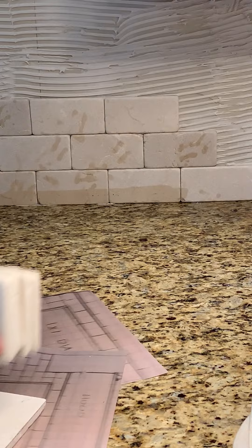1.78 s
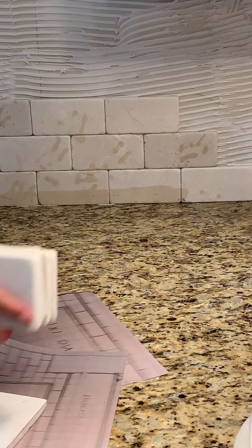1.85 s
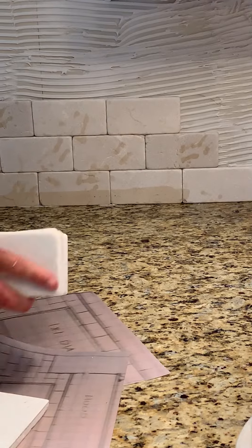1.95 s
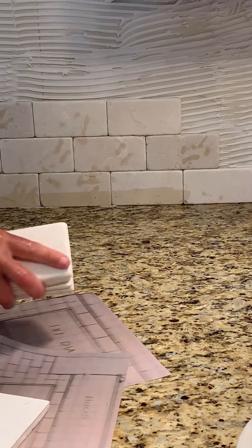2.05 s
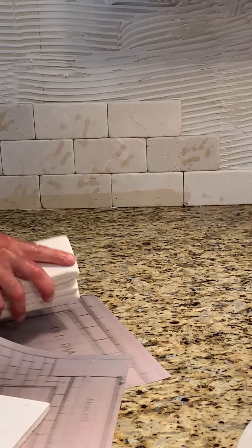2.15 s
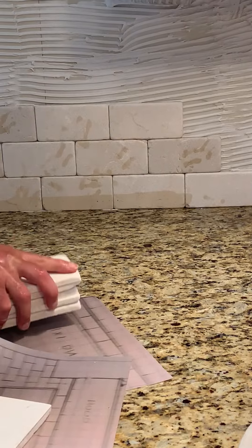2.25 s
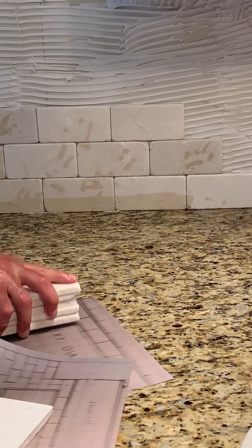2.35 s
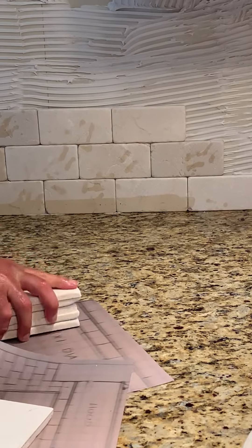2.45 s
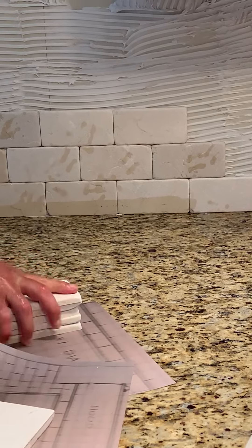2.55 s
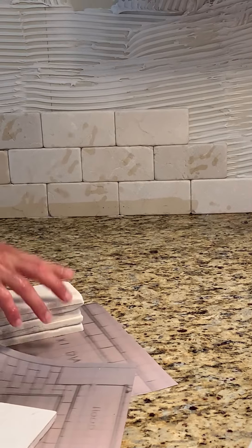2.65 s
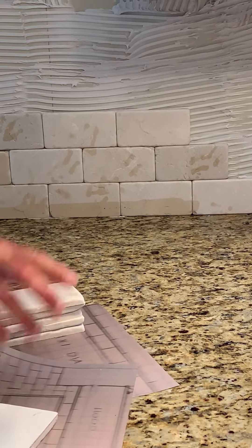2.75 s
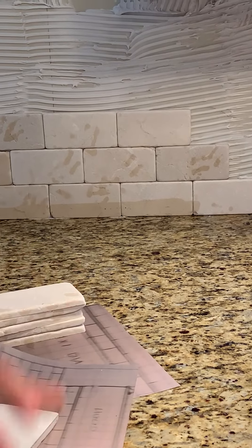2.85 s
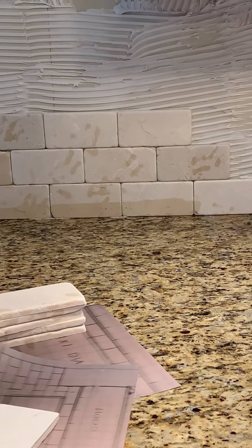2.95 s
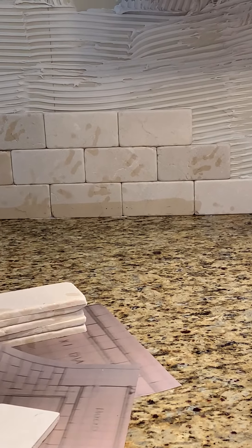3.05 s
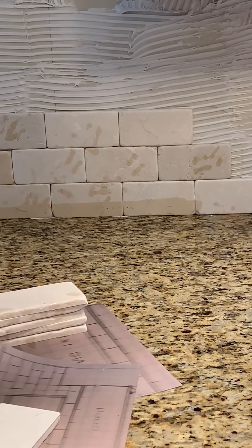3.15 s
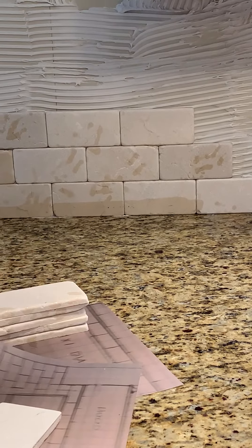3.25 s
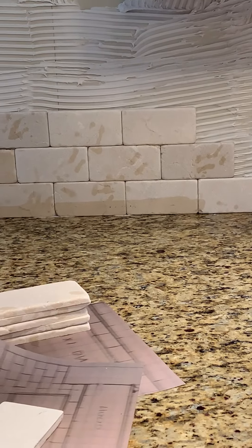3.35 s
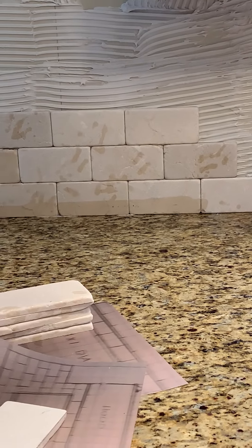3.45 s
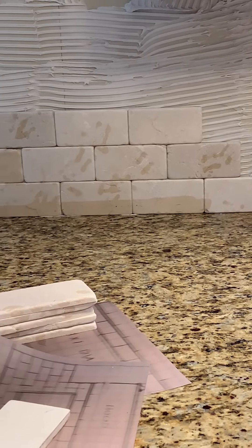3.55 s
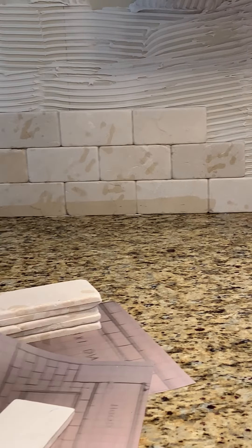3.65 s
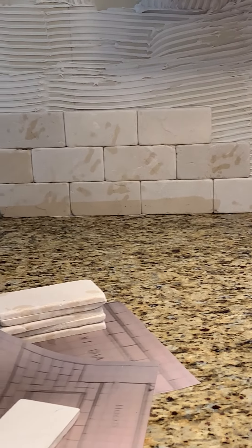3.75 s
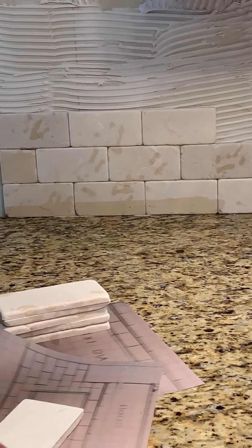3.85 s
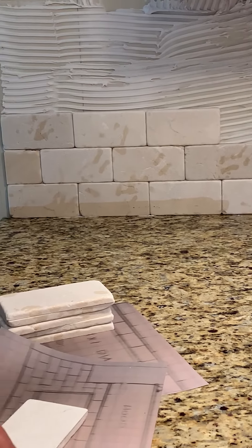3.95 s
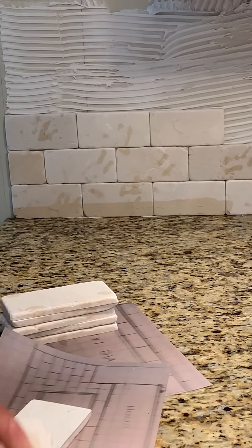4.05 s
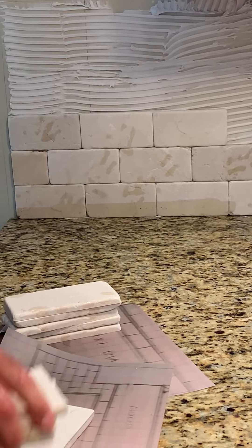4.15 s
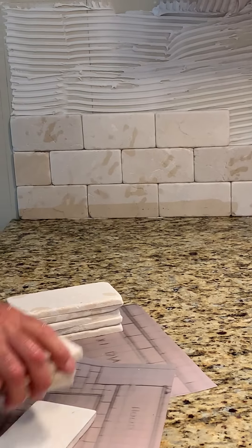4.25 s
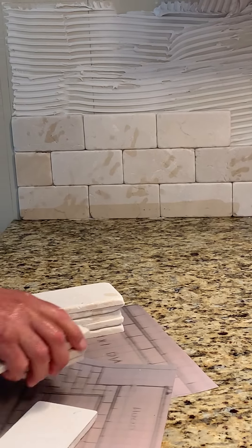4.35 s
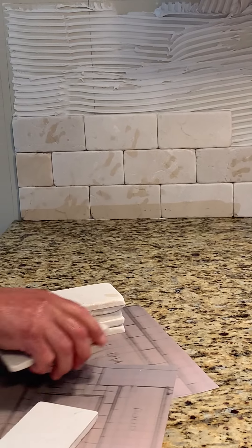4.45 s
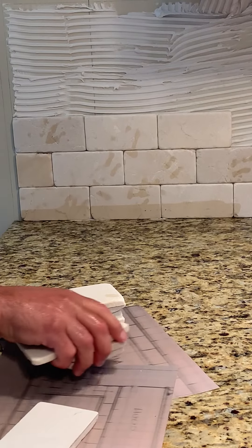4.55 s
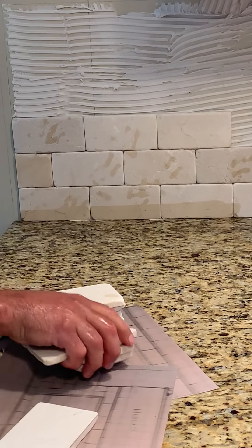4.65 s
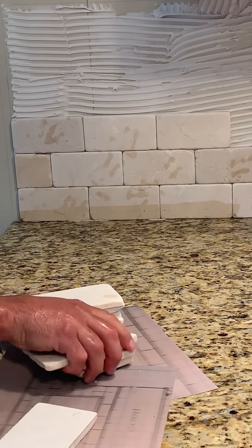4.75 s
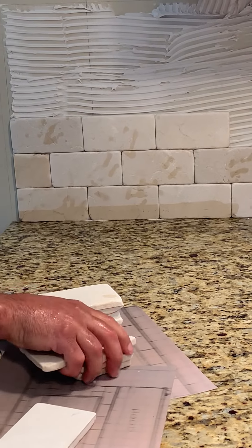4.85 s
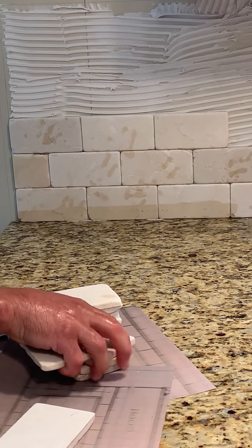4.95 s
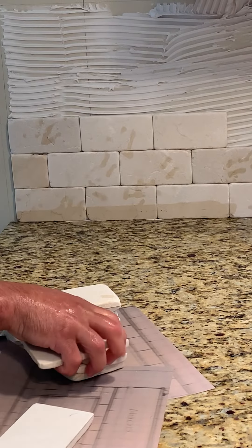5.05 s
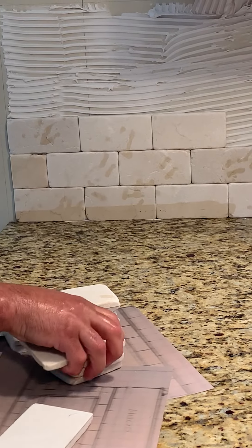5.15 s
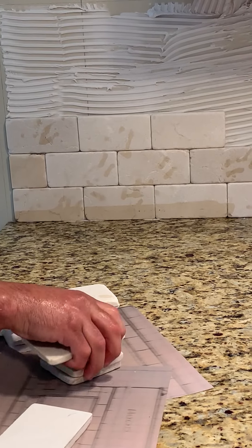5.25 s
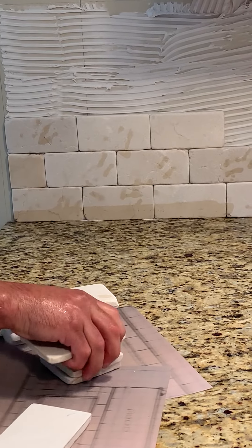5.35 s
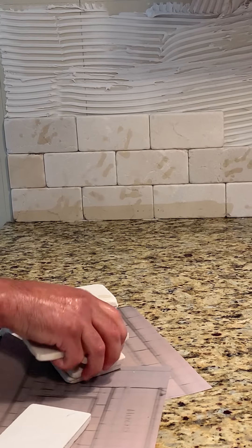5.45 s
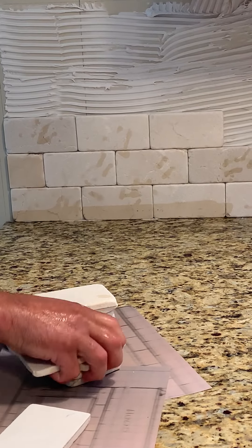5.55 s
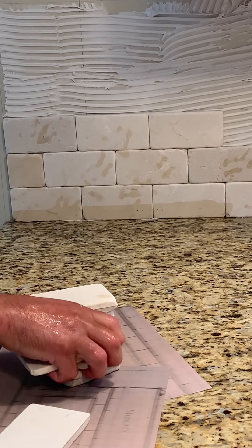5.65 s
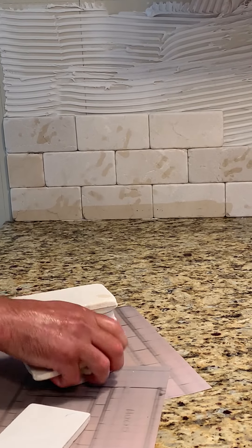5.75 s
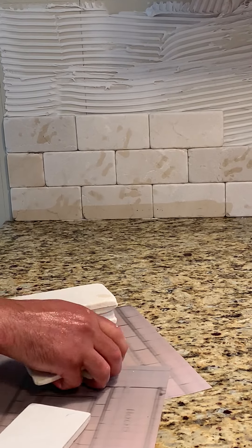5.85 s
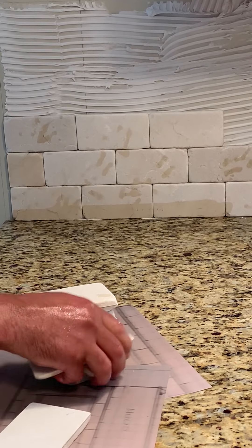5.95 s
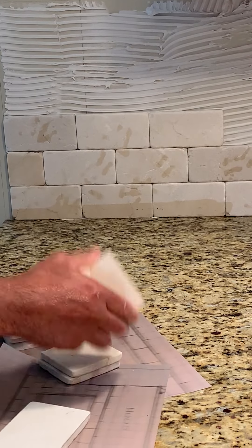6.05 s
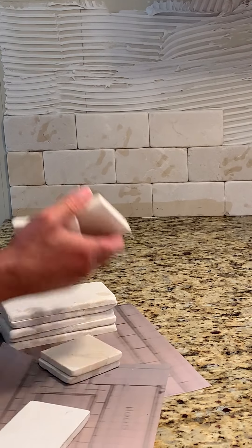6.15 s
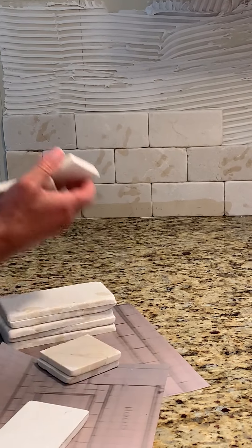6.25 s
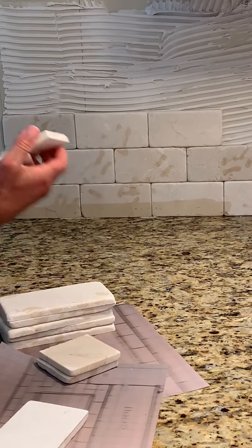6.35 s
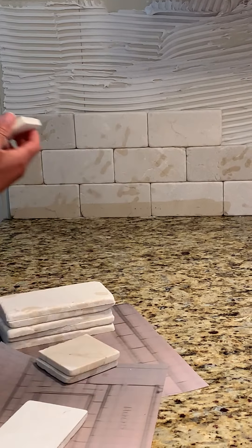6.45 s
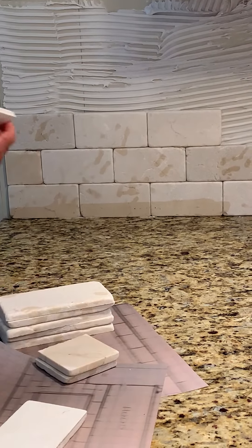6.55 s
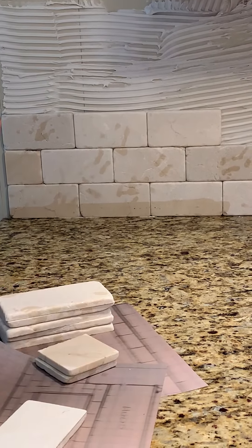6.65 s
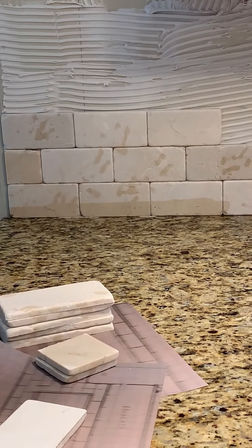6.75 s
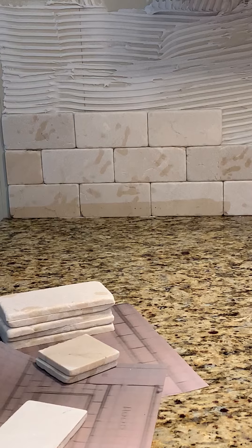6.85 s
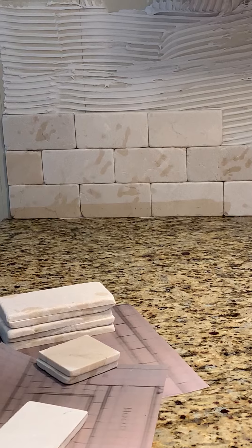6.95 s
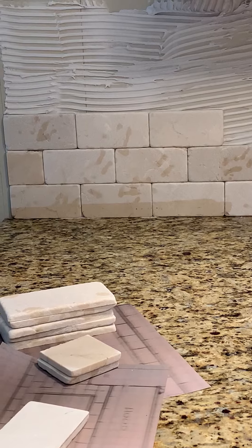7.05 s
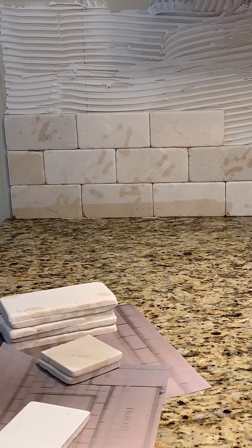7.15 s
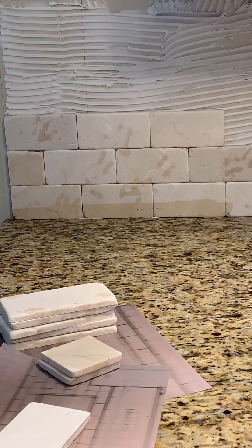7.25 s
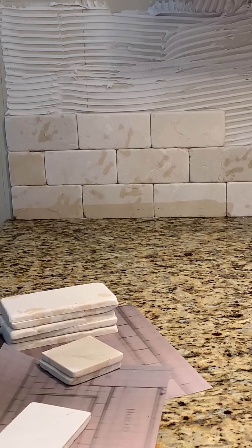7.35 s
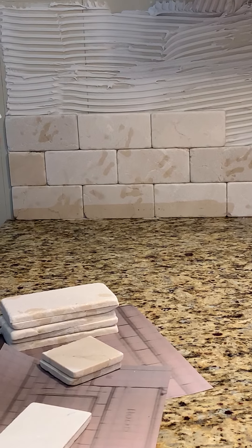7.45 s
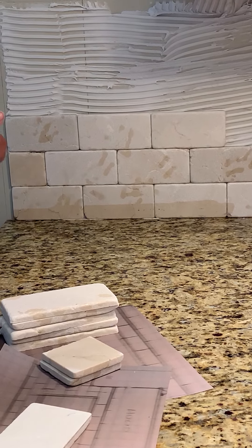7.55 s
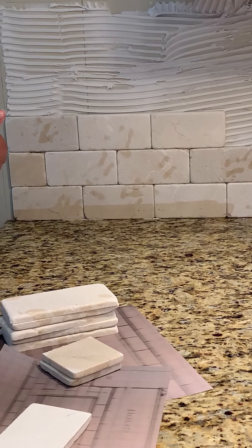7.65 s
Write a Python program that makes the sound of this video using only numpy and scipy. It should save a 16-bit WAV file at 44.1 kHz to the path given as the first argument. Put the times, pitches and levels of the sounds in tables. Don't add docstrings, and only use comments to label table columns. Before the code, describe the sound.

Close to a phone microphone in a small hard kitchen, long stone tiles are set down on paper with gritty clacks and scrapes. A loud, coarse clatter of pieces follows, then a bright ringing rattle from a small tile, duller gripped knocks, and finally faint taps and soft counter thuds. A low compressor hum and soft air noise run throughout.

```python
import sys
import numpy as np
from scipy import signal
from scipy.fft import rfft, irfft, next_fast_len
from scipy.io import wavfile
from scipy.ndimage import uniform_filter1d

SR = 44100
rng = np.random.default_rng(int(sys.argv[2]) if len(sys.argv) > 2 else 0)


def transcribe(signal):
    frames = np.atleast_2d(signal).T
    limited = np.clip(frames, -1, 1)
    pcm = np.round(limited * 32767).astype(np.int16)
    wavfile.write(sys.argv[1], SR, pcm)


def linear_from_db(decibels):
    return 10 ** (np.asarray(decibels, float) / 20)


N = 340011

# (pitch [Hz], level [dB], t60 [s])
SMALL_MODES = [(2630, -9.5, 0.012), (2757, -2, 0.036), (2990, -16.5, 0.025), (3870, -11.5, 0.019),
               (4310, -12.5, 0.017), (4740, -12.5, .01), (5408, -1, 0.0079), (5810, 4, 0.021),
               (6180, 6, .05), (6053, 4.5, 0.1), (6182, 5.5, 0.23), (6280, 2, .07), (6345, -1, 0.036),
               (9280, -8, 0.043), (11350, 0, 0.15), (14900, -10.5, 0.0815), (15250, -7, .06)]
STIFF_HZ = 4430
# scrape [Hz], treble [dB], treble lost per dB of ring [dB]
SMALL_GRIT = (3300, -11, 0.24)
FINE_GRIT_DB, COARSE_GRIT_DB = 1.2, 3.0


def band(x, lo_hz, hi_hz, order=2):
    edges = [lo_hz, min(hi_hz, .45 * SR)]
    return signal.sosfilt(signal.butter(order, edges, "bandpass", fs=SR, output="sos"), x)


def unit(x):
    return x / np.sqrt(np.mean(x ** 2))


def peak(x, db):
    return x * linear_from_db(db) / np.abs(x).max()


def on_log(hz, table):
    f, v = np.transpose(table)
    return np.interp(np.log(hz + 1), np.log(f), v)


def walk(rate):
    hold = int(SR / rate)
    steps = np.repeat(rng.standard_normal(N // hold + 1), hold)
    return 1.3 * uniform_filter1d(uniform_filter1d(steps, hold), hold)[:N]


def add(track, start_s, x):
    i = int(start_s * SR)
    x = x[..., max(-i, 0):N - i]
    track[..., max(i, 0):max(i, 0) + x.shape[-1]] += x


def long_tiles():
    # (time [s], crack peak [dB], crack pitch [Hz], treble re crack [dB], ring re crack [dB])
    long_knocks = [(0.009, -47.5, 1310, 7, 1.5), (0.049, -48, 666, 3.5, 6.5), (0.307, -62, 3000, 3, -8),
                   (0.371, -39, 1200, -6, -22), (2.39, -44, 1140, -26, 5), (2.46, -26, 750, -12.5, 16),
                   (2.463, -14.5, 2090, -46, -3), (2.597, -28, 2400, -18, 4),
                   (2.601, -23.5, 2670, -20.5, 8.5), (2.604, -27, 824, -29, -1),
                   (3.151, -41.5, 900, -11, -2), (3.249, -24, 3700, -4, -3.5), (3.393, -38, 730, 0, 5),
                   (3.44, -37, 2500, -8, 7)]
    # (middle [s], scrape [dB], ring re scrape [dB], half length [s])
    long_rubs = [(.25, -53, 5, 0.026), (.373, -58, 20, 0.018), (.46, -68, 6, 0.016), (.50, -64, 25, 0.016),
                 (.555, -69, 28, 0.029), (.751, -63, 25, 0.009), (.797, -58.5, 27, 0.0064),
                 (.835, -57.5, 29.5, 0.038), (.94, -59, 36.5, 0.045), (1.054, -56.5, 35, .024),
                 (1.092, -75, 41, 0.081), (2.456, -44, -1, 0.0061), (2.58, -53.5, 6, 0.051),
                 (2.601, -50, 3, 0.0067)]
    # (pitch [Hz], level [dB], t60 [s])
    long_modes = [(750, 0, 0.025), (1970, -3, 0.013), (2654, -9, 0.029), (3197, 0.5, 0.041),
                  (3850, -16.5, 0.0049), (6840, 0.5, 0.029), (6630, -3, 0.021), (7100, -23, 0.035),
                  (10230, -8.5, 0.1), (11160, -15.5, 0.034), (12020, -7, 0.076), (13100, -13, 0.042),
                  (13250, -17, 0.027)]
    slides = rubs(long_rubs, hz=3100, treble_db=-2.6, loss=0.51)
    return tile(blows(long_knocks), slides, long_modes, FINE_GRIT_DB, contact_s=0.0037, octaves=1.0)


def pieces():
    # (time [s], crack peak [dB], crack pitch [Hz], treble re crack [dB], ring re crack [dB])
    piece_knocks = [(3.993, -47, 802, -18.5, 18), (4.003, -39.5, 1010, -12.5, 11),
                    (4.083, -31.5, 1630, -7.5, -20), (4.099, -27, 802, -3.5, -9),
                    (4.108, -18, 859, -6.5, -25), (4.124, -18.5, 1280, -6.5, -12),
                    (4.133, -18, 1490, -7.5, -9), (4.1454, -34, 3750, 2.5, 5), (4.1632, -10, 4240, -6.5, 4),
                    (4.209, -34, 826, -4, -14), (4.211, -36, 2800, -11.5, 11),
                    (4.5836, -41.5, 2910, -16, 6), (4.777, -24.5, 1000, -27.5, -8.5),
                    (4.894, -45.5, 2500, 0, -6.5), (4.9062, -31, 900, -7.5, -4),
                    (5.11, -42, 800, -30, -9.5), (5.161, -43.5, 450, -10.5, -1.5),
                    (5.555, -30, 867, -12.5, 10), (5.602, -22.5, 1500, -16.5, 4),
                    (5.606, -29, 800, -30, -10)]
    # (middle [s], scrape [dB], ring re scrape [dB], half length [s])
    piece_rubs = [
        (4.12, -29, -17, 0.032),
        (4.14, -44, -9, 0.013),
        (4.61, -52, 1, 0.05),
        (5.072, -60, -10.5, 0.064),
    ]
    # (pitch [Hz], level [dB], t60 [s])
    piece_modes = [(767, -13, 0.023), (2910, -7.5, 0.042), (3765, -5.5, 0.022), (5180, 1.5, 0.012),
                   (6490, -17, 0.0097), (7460, -7, 0.024), (8570, -6, 0.022), (10350, -9.5, .012),
                   (11170, -10.5, 0.015)]
    # (middle [s], scrape [dB], scrape pitch [Hz], half length [s])
    paper_drags = [(.04, -68.5, 2950, .064), (2.42, -66, 2960, .062), (3.077, -61.5, 3500, .013),
                   (3.18, -44.5, 900, .031), (3.21, -59, 3040, .09), (3.28, -54.5, 3000, .057),
                   (3.397, -42, 2940, .017), (3.396, -40.5, 900, 0.013), (3.34, -74, 4000, 0.029),
                   (5.22, -73, 6000, 0.017), (3.435, -49.5, 2000, .034), (4.02, -61, 900, .03),
                   (4.044, -45.5, 1530, .025), (4.092, -36, 1533, .019), (4.112, -30.5, 770, .025),
                   (4.19, -46.5, 3000, .028)]
    # (middle [s], scrape [dB], scrape pitch [Hz], half length [s])
    shuffles = [(4.215, -42, 626, .04), (4.245, -48.5, 198, .03), (4.93, -46.5, 362, .05),
                (5.118, -43, 500, .033), (5.184, -47.5, 273, .058), (5.225, -55, 299, .023),
                (5.571, -47, 900, .04), (5.624, -46.5, 293, .049), (6.1, -62.5, 1393, 0.081),
                (6.49, -56, 1380, 0.11)]
    # (middle [s], scrape [dB], scrape pitch [Hz], half length [s])
    thuds = [(2.504, -51.5, 178, .043), (2.628, -44, 245, 0.034), (3.376, -39.5, 172, .025),
             (4.79, -38.5, 610, .016), (5.613, -29.5, 815, .012), (7.265, -35, 178, 0.017),
             (7.312, -38, 174, 0.022), (7.32, -41, 383, .04), (7.375, -53, 400, .03)]
    slides = rubs(piece_rubs, hz=3020, treble_db=-14, loss=0.37)
    slides = slides + drags(paper_drags, treble_db=-5, slope_db=4.86, ring_db=-14)
    slides = slides + drags(shuffles, treble_db=-22.5, slope_db=0.53, ring_db=-7.5)
    slides = slides + drags(thuds, treble_db=-39, slope_db=0.68, ring_db=-43)
    return tile(blows(piece_knocks), slides, piece_modes, COARSE_GRIT_DB, contact_s=0.0026, octaves=0.9)


def small_tile():
    # (time [s], crack peak [dB], crack pitch [Hz], treble re crack [dB], ring re crack [dB])
    small_knocks = [
        (5.2884, -19.5, 2100, -2, 16.7),
        (5.2902, -20, 3384, -10.5, 2.8),
        (5.2942, -15.5, 2900, -7.5, 3),
        (5.2976, -18.5, 2750, -3, 13),
        (5.3035, -27.5, 2790, -4, 6.7),
        (6.877, -37, 1770, -22, 3.6),
        (7.138, -36.5, 3500, -11, 11.6),
    ]
    # (middle [s], scrape [dB], ring re
    # scrape [dB], half length [s])
    small_rubs = [(5.253, -56, 1.5, 0.016), (5.285, -36, 5, .0065), (5.297, -36.5, 16.5, 0.024),
                  (6.725, -69, 32, 0.021), (6.76, -82, 17, .029), (6.97, -64, 18.5, 0.091),
                  (7.04, -56.5, 1, 0.032), (7.12, -63.5, 23, .02), (7.145, -44.5, 20, 0.011),
                  (7.175, -58, 14.5, 0.047)]
    return tile(blows(small_knocks), rubs(small_rubs, *SMALL_GRIT), SMALL_MODES, FINE_GRIT_DB,
                contact_s=0.00092, octaves=0.59)


def gripped_tile():
    # (time [s], crack peak [dB], crack pitch [Hz], treble re crack [dB], ring re crack [dB])
    gripped_knocks = [
        (5.529, -33.5, 4100, -5, 19),
        (5.534, -18.5, 2700, -34, 4.2),
        (5.824, -27.5, 2270, -20, 11.4),
    ]
    # (middle [s], scrape [dB], ring re scrape [dB], half length [s])
    gripped_rubs = [
        (5.419, -52, 31, 0.025),
        (5.797, -65.5, 22, 0.0066),
        (6.12, -87, 26, .08),
        (6.5, -80, 22, 0.065),
        (6.65, -80, 26, 0.013),
    ]
    stilled = [row for row in SMALL_MODES if row[0] < 8000]
    return tile(blows(gripped_knocks), rubs(gripped_rubs, *SMALL_GRIT), stilled, FINE_GRIT_DB,
                contact_s=0.0012, octaves=0.72, top_hz=7540.0)


def blows(rows):
    return [(s, db, hz, -12 - 10.5 * np.log2(hz / 800), treble_db, ring_db)
            for s, db, hz, treble_db, ring_db in rows]


def rubs(rows, hz, treble_db, loss):
    return [(s, db, hz, treble_db - loss * ring_db, ring_db, length) for s, db, ring_db, length in rows]


def drags(rows, treble_db, slope_db, ring_db):
    return [(s, db, hz, treble_db + slope_db * np.log2(hz / 1000), ring_db, length)
            for s, db, hz, length in rows]


def tile(knocks, slides, modes, grit_db, contact_s, octaves, top_hz=14200.0):
    track = np.zeros((4, N))
    for s, *blow in knocks:
        add(track, s, knock(*blow, contact_s, octaves, top_hz))
    grit = unit(rng.standard_normal(N) * linear_from_db(grit_db * walk(600)))
    for s, *stroke, length in slides:
        add(track, s - length, slide(grit[int(s * SR):], *stroke, length, top_hz))
    direct, bend_drive, stiff_drive, spread = track
    return np.array([direct, spread]) + linear_from_db(12.5) * ring(bend_drive, stiff_drive, modes)


def knock(db, hz, thump_db, treble_db, ring_db, contact_s, octaves, top_hz):
    t = np.arange(int(.04 * SR)) / SR
    noise = rng.standard_normal(len(t))
    tap = 4.58 * np.sin(np.pi * np.minimum(t / .00006, 1))
    blow = noise * np.exp(-t / (contact_s + 3.2 / hz)) * np.minimum(t / 0.0016, 1)
    snap = noise * np.exp(-t / contact_s)
    crack = peak(band(blow, hz / 2 ** octaves, hz * 2 ** (1.07 * octaves), order=3), db)
    thump = peak(band(blow, 99, 500), db + thump_db + 5.5)
    treble = peak(band(snap, STIFF_HZ, top_hz, order=3), db + treble_db + 2.5)
    flick = noise * np.exp(-t / .0004)
    wide = unit(band(flick, hz / 2 ** octaves, hz * 2 ** octaves)) * crack.std()
    bend_drive = linear_from_db(db + ring_db) * tap
    stiff_drive = linear_from_db(db + treble_db + ring_db) * tap
    return np.array([crack + thump + treble, bend_drive, stiff_drive, wide + treble + thump])


def slide(grit, db, hz, treble_db, ring_db, length, top_hz):
    swell = np.hanning(int(2 * length * SR))
    rub = grit[:len(swell)]
    hiss = linear_from_db(treble_db) * unit(band(rub, STIFF_HZ, top_hz))
    scrape = unit(band(rub, hz / 1.61, hz * 1.446)) + hiss
    bend_drive = linear_from_db(0.68 * ring_db - 6.0) * band(rub, 1900.0, 4937.0)
    stiff_drive = linear_from_db(treble_db + ring_db) * rub
    return linear_from_db(db) * swell * np.array([scrape, bend_drive, stiff_drive, scrape])


def ring(bend_drive, stiff_drive, modes):
    bend, stiff = np.zeros((2, N))
    for k, (hz, db, t60) in enumerate(modes):
        low = hz < STIFF_HZ
        drive, total = (bend_drive, bend) if low else (stiff_drive, stiff)
        total += (-1) ** k * linear_from_db(db) * mode(drive, hz, t60)
    bend_gain = np.array([[1], [linear_from_db(-7)]])
    return bend_gain * bend + stiff


def mode(x, hz, t60):
    r = np.exp(-np.log(1000) / (max(t60, .005) * SR))
    return signal.lfilter([1 - r, 0, r - 1], [1, -2 * r * np.cos(2 * np.pi * hz / SR), r * r], x)


def room(x):
    # (low edge [Hz], high edge [Hz], t60 [s], level [dB])
    decay_bands = [(101.3, 900, 0.45, 2), (900, 2010, 0.54, 0.5), (2500, 4500, 0.41, -2.5),
                   (4770, 4900, 0.42, -1.5), (6800, 10500, 0.21, -4.5), (10500, 21000, 0.22, -8)]
    direct, spread = x[0], x[1:]
    echo = rng.standard_normal((2, int(.7 * SR)))
    t = np.arange(echo.shape[1]) / SR
    tail = np.zeros(echo.shape)
    for lo, hi, t60, db in decay_bands:
        fade = linear_from_db(-60 * t / t60) / np.sqrt(t60 * SR / 14)
        tail += linear_from_db(db) * band(echo, lo, hi, order=3) * fade
    onset = np.clip((t - .003) / .006, 0, 1)
    return direct + signal.fftconvolve(spread[:1], tail * onset, axes=1)[:, :N]


def hum():
    turn_db = [-89.5, -92.5, -54, -52, -62.5, -61.5, -62.5, -48.5, -62, -85.5, -78.5, -57, -65, -60, -78,
               -80.5, -72.5, -80.5, -64.5, -65.5, -61.5, -69.5, -87, -89, -68.5, -65, -78, -71.5, -62.5]
    t = np.arange(N) / SR
    turn = 2 * np.pi * np.cumsum(14.06 * (1 + 0.0015 * walk(1.5))) / SR
    start = rng.uniform(0, 2 * np.pi, len(turn_db))
    total = linear_from_db(-68) * np.sin(2 * np.pi * 120 * t)
    for k, db in enumerate(turn_db):
        waver = 1 + 0.042 * walk(4.2)
        total += linear_from_db(db) * waver * np.sin((k + 1) * turn + start[k])
    return np.sqrt(2) * total


def air():
    # (frequency [Hz], density [dB per Hz])
    air_colour = [(30, -87.5), (50, -71.5), (150, -79.5), (350, -82.5), (520, -84), (620, -81.5),
                  (690, -77), (770, -88.5), (1300, -86), (2100, -96), (3500, -101), (5200, -103),
                  (6200, -112), (8500, -118), (16000, -124)]
    size = next_fast_len(N)
    hz = np.fft.rfftfreq(size, 1 / SR)
    spectrum = rfft(rng.standard_normal((2, size))) * linear_from_db(on_log(hz, air_colour)) * np.sqrt(SR / 2)
    return irfft(spectrum, size)[:, :N] * linear_from_db(.6 * walk(2.8))


def scene():
    tiles = long_tiles() + pieces() + small_tile() + gripped_tile()
    left_only = np.array([[1], [0]])
    return room(tiles) + air() + hum() * left_only


def band_limit(x):
    return signal.sosfilt(signal.butter(12, 16830, fs=SR, output="sos"), x)


def record(dry):
    # (frequency [Hz], lead [rad])
    lead = [(0, 0), (1000, .3), (2200, 1.1), (3600, 1.5), (4700, np.pi), (15350, 6 * np.pi),
            (22050, 9 * np.pi)]
    # (frequency [Hz], share [0-1])
    common = [(60, 0.98), (200, 0.94), (350, 0.6), (600, 0), (1000, 0), (1700, 0.56), (2600, 0),
              (3800, 0.84), (4500, 0.98)]
    size = next_fast_len(N)
    hz = np.fft.rfftfreq(size, 1 / SR)
    left, right = rfft(dry, size)
    alike = np.clip(on_log(hz, common), 0, 1)
    right = alike * left + np.sqrt(1 - alike ** 2) * right
    turn = np.exp(.5j * np.interp(hz, *np.transpose(lead)))
    x = irfft(np.array([left * turn, right / turn]), size)[:, :N]
    limit = 1.1
    return band_limit(limit * np.tanh(x / limit))


dry = scene()
out = record(dry)
transcribe(out)
```